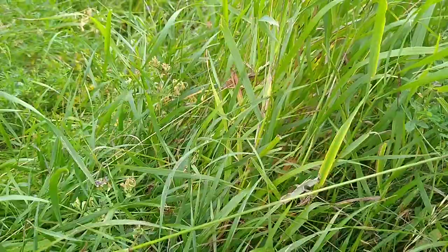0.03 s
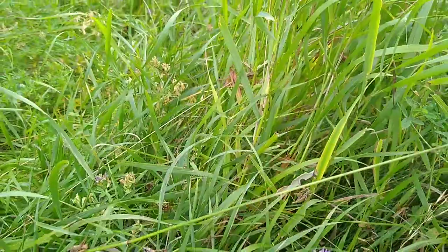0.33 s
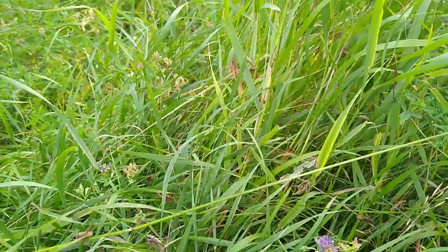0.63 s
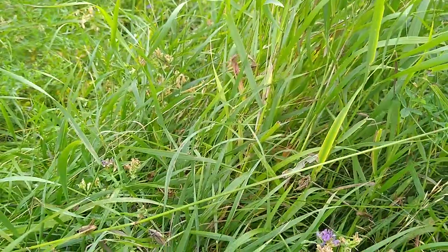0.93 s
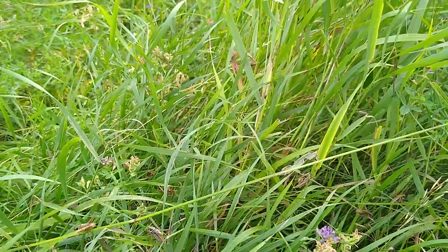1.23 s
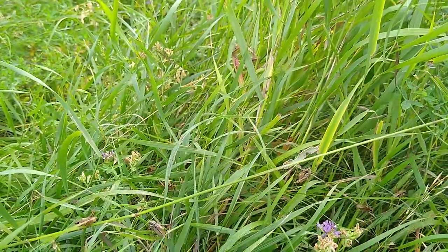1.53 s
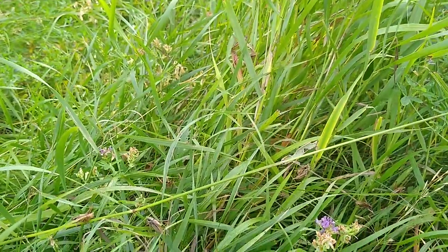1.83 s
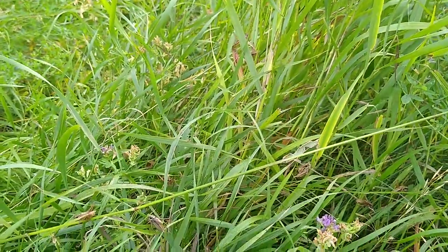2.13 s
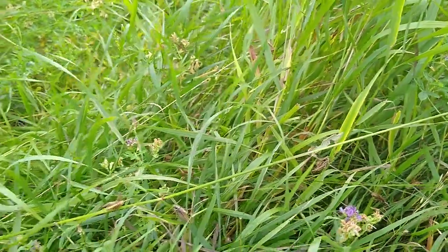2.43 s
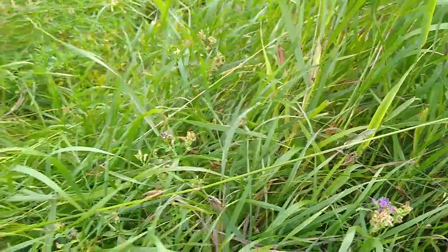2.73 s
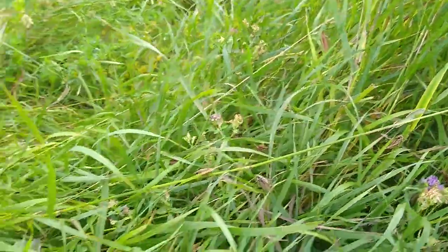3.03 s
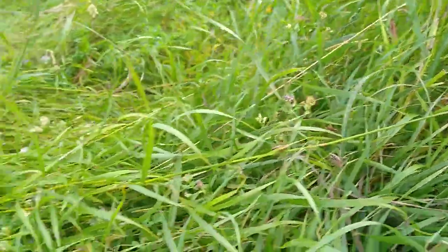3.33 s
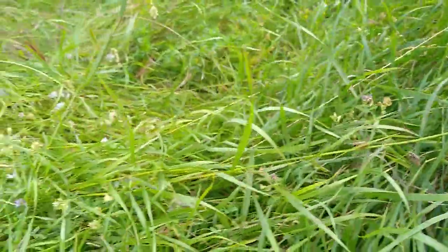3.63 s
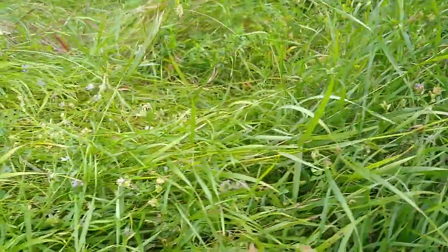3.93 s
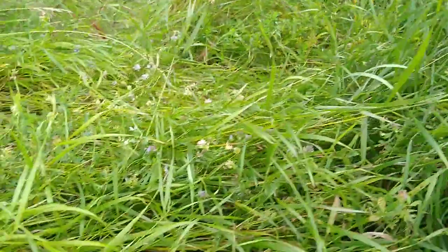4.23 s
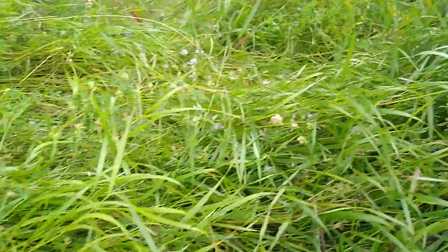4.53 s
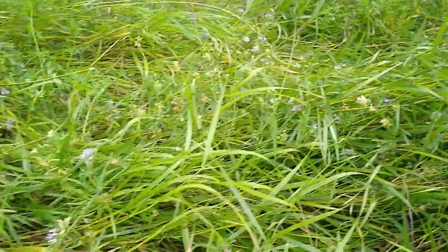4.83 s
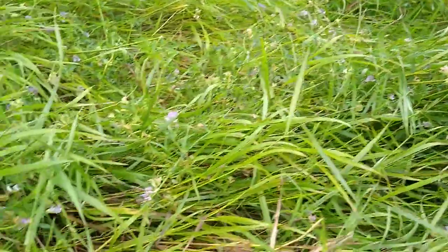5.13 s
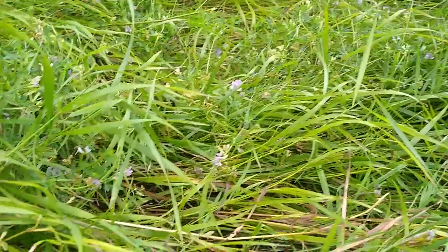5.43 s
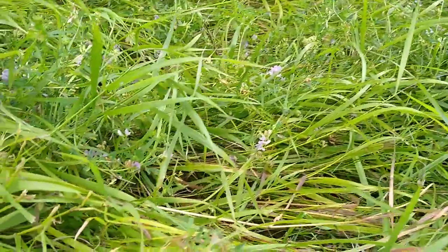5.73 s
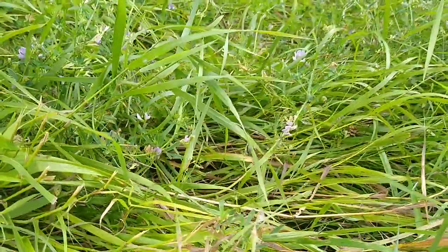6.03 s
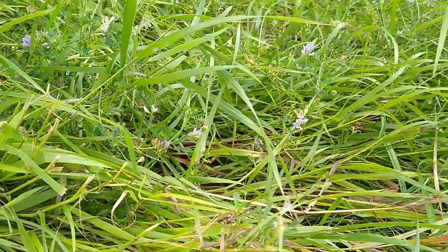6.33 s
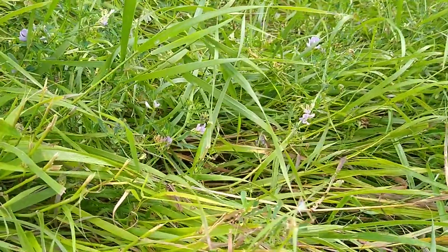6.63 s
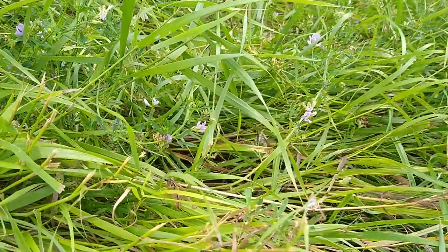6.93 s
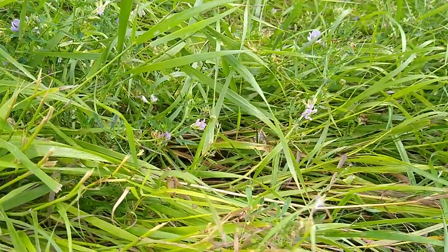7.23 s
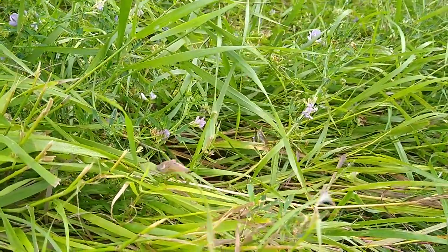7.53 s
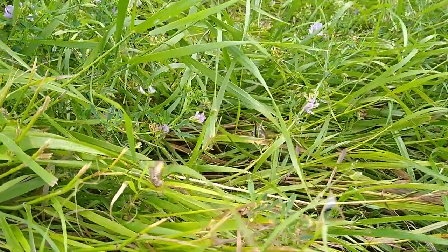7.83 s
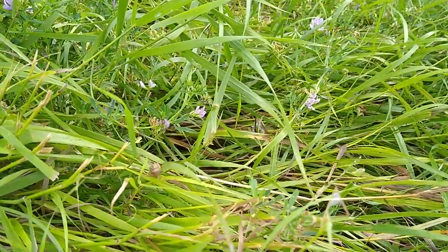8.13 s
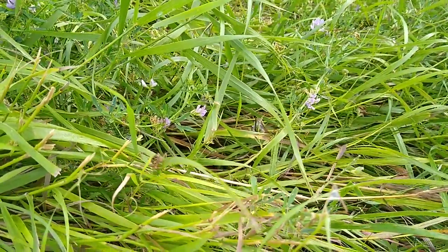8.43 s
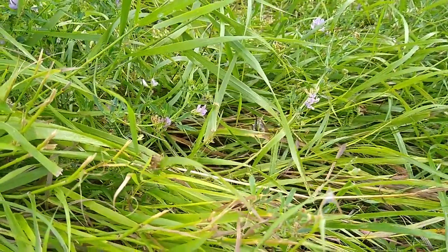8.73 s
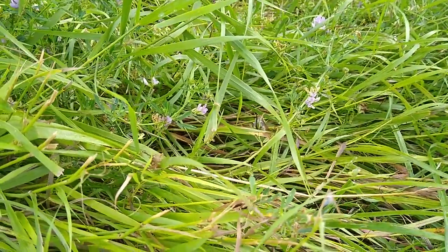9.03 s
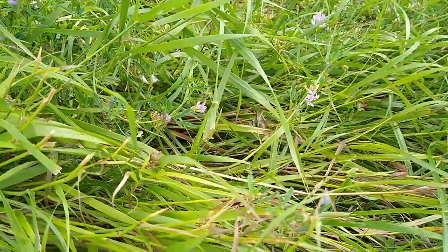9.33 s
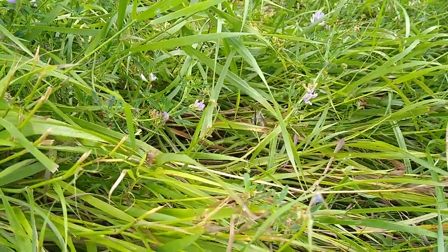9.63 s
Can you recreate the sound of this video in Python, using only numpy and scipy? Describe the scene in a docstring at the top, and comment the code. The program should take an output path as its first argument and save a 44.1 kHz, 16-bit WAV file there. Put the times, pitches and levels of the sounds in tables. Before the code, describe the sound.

A continuous high-pitched insect buzz shifts between singers, while a light breeze stirs grass and far traffic rumbles.

```python
"""A high, rasping buzz in tall grass: near bush-crickets take turns over a chorus of far ones.
They sing by stridulation: about fifty times a second the closing wings drag a file of teeth over
a scraper, and the impacts excite a wing resonance. A breeze rustles the grass, a distant road
rumbles, and the drone of an engine grows as it draws near."""
import sys
import numpy as np
from scipy import signal
from scipy.fft import rfft, irfft, next_fast_len
from scipy.io import wavfile

SR = 44100
rng = np.random.default_rng(int(sys.argv[2]) if len(sys.argv) > 2 else 0)


def inscribe(sig):
    """Save sig as 16-bit PCM at rate SR to the path in sys.argv[1].

    A 1-D sig is mono; a 2-D sig holds one channel per row.
    Samples are clipped to [-1, 1] before scaling.
    """
    pcm = np.round(np.clip(np.atleast_2d(sig).T, -1, 1) * 32767)
    wavfile.write(sys.argv[1], SR, pcm.astype(np.int16))


N = 431738
TIME_S = np.arange(N) / SR
EARS = np.array([[1], [-1]])   # left, right
MIC_LAG_S = .00048   # travel time of sound between the microphones


def near_crickets():
    """Stridulation: long wing strokes make a rasp, short ones a train of ticks."""
    # Each row: start and end in seconds, level, settling drop and left-over-right balance in dB,
    # strokes per second at start, middle and end, time of one stroke in seconds, haze level in dB,
    # wing resonance in Hz and its height in dB.
    rasps = [(0, .44, -33.2, 0, 3, 51.12, 50.93, 50.6, .2313, -2, 15800, 1.5),
             (2.65, 3.6, -46.5, 0, -5, 48.3, 48.3, 48.3, 3.0, 0, 13050, 9),
             (3.66, 6.33, -35.4, 5.5, -7, 51.5, 51.59, 50.34, 4.9893, -2.3, 14800, 1.5),
             (9.42, 9.9, -46, 0, -7, 52.8, 51.0, 51.4, 9.619, 1, 14700, 3)]
    # Each row: as for the rasps, but the last column is the stroke width in seconds.
    ticks = [(.4, 1.38, -46.3, 0, 3, 52.46, 49.74, 50.66, .893, 0, 14500, .00035),
             (.45, 2.6, -50, 1, -5, 53.6, 53, 51.5, 1.2, 2, 14300, .0005),
             (1.41, 2.65, -45.8, 0, 3.5, 49.07, 49.47, 50.24, 2.0356, 0, 14700, .0003),
             (4.2, 8.05, -46.6, 1, -7, 51.6, 49.96, 46.42, 6.1395, -1, 14450, .0005),
             (7.7, 9.38, -52, 1, 3, 52.5, 51.73, 50.33, 8.5522, 2, 14600, .0005)]
    buzz = 0
    for voice, songs in ((rasping_wing, rasps), (ticking_wing, ticks)):
        for start_s, end_s, level_db, drop_db, pan_db, *rates, stroke_at_s, haze_db, hz, timbre in songs:
            gain, per_s = song(start_s, end_s, level_db, drop_db, rates)
            buzz = buzz + gain * voice(per_s, stroke_at_s, pan_db, haze_db, hz, timbre)
    return buzz


def rasping_wing(per_s, stroke_at_s, pan_db, haze_db, wing_hz, peak_db):
    """Impulse excitation: each tooth that slips over the scraper clicks the resonant wing."""
    # Each row: frequency in Hz, spectral density of a near wing in relative dB.
    wing = [(7500, -42), (9000, -34), (10500, -23), (12000, -15.5), (13300, -8), (14500, -2.5),
            (15100, -2.5), (15800, 0)]
    half_width_hz, teeth_per_s = 550, 1700
    spectrum = [(hz, at_hz(wing, hz) + peak_db / (1 + ((hz - wing_hz) / half_width_hz) ** 2))
                for hz in np.linspace(wing[0][0], wing[-1][0], 40)]
    force = wing_force(per_s, stroke_at_s, stroke_s=.0022, opening_db=-14) * from_db(drift(50))
    teeth_passed = np.cumsum(teeth_per_s * from_db(2.2 * drift(1200))) / SR
    slips = np.diff(np.floor(teeth_passed), prepend=0)
    clicks = slips * force * from_db(rng.standard_normal(N))
    return through_grass(coloured(clicks, spectrum), spectrum, force, pan_db, haze_db, haze_s=.0021)


def ticking_wing(per_s, stroke_at_s, pan_db, haze_db, wing_hz, stroke_s):
    """Forced vibration near resonance: each quick stroke gives one ping of slightly different pitch."""
    force = wing_force(per_s, stroke_at_s, stroke_s, opening_db=-12) * from_db(drift(50))
    ping_hz = wing_hz + 350 * (drift(50) + drift(2500))
    ping = force * np.sin(2 * np.pi * np.cumsum(ping_hz) / SR)
    resonance = [(wing_hz + offset_hz, db)
                 for offset_hz, db in [(-4000, -24), (-1500, -10), (-400, 0), (300, 0), (1200, 0)]]
    return through_grass(ping, resonance, force, pan_db, haze_db, haze_s=.002)


def wing_force(per_s, stroke_at_s, stroke_s, opening_db):
    """Periodic drive: force builds through each stroke and lets go quickly; opening is the weaker."""
    cycles = np.cumsum(per_s) / SR
    cycles = cycles - np.interp(stroke_at_s, TIME_S, cycles) + .5 + .015 * drift(40)

    def stroke(lag_cycles):
        offset = ((cycles - lag_cycles) % 1 - .5) / per_s / stroke_s
        return np.exp(-.5 * (offset / np.where(offset < 0, 1.35, .65)) ** 2)
    return stroke(0) + from_db(opening_db) * stroke(.6)


def song(start_s, end_s, level_db, drop_db, rates):
    """Amplitude and rate modulation: a song swells, settles by `drop_db`, falters and dies away."""
    attack_s, settle_s, release_s = .05, .76, .064
    falter_per_s, falter_s = 3.5, .08
    age = np.clip(TIME_S, start_s, end_s) - start_s
    edges = np.maximum(start_s - TIME_S, 0) / attack_s + np.maximum(TIME_S - end_s, 0) / release_s
    settled = 1 - np.exp(-(age / settle_s) ** 2)
    gain = from_db(level_db - drop_db * settled) * np.exp(-edges)
    per_s = np.interp(TIME_S, np.linspace(start_s, end_s, len(rates)), rates)
    falter = falter_per_s * np.exp((start_s + age - end_s) / falter_s)
    return gain, per_s - falter


def through_grass(direct, spectrum, force, pan_db, haze_db, haze_s):
    """Scattering: blades add a short haze to each stroke; the far microphone hears the stroke later."""
    decay = np.exp(-1 / (haze_s * SR))
    scattered_power = signal.lfilter([1 - decay], [1, -decay], force ** 2 + 1e-12)
    haze = coloured(np.sqrt(scattered_power) * rng.standard_normal((2, N)), spectrum)
    lag_samples = int(pan_db * 2)
    direct = rms_one(np.array([direct, np.roll(direct, lag_samples)]))
    return rms_one(direct + from_db(haze_db) * haze) * from_db(EARS * pan_db / 2)


def leaf_echoes(buzz, echo_db=-19, sways_per_s=2.5):
    """Comb filtering: faint echoes from swaying leaves come and go, slowly recolouring the buzz."""
    # Each entry: the delay of one echo in seconds.
    delays_s = [.0005, .0013, .0034]
    echoes = sum(drift(sways_per_s) * np.roll(buzz, int(s * SR), axis=-1) for s in delays_s)
    return buzz + from_db(echo_db) * echoes


def far_crickets():
    """Incoherent sources: two groups of far singers, left and right, are heard through the grass."""
    # Each row: frequency in Hz, spectral density in relative dB.
    left_wing = [(7000, -35.5), (8500, -28.5), (10000, -19.5), (11300, -12), (12800, -8.5), (14200, -10),
                 (15100, -2.5), (15700, -1)]
    right_wing = [(7000, -43), (8500, -30.5), (10000, -21), (11300, -14.5), (12800, -9), (14200, -4.5),
                  (15100, -1), (15700, -3)]
    # Each row: time in seconds, level in dB, which changes as the microphone turns away.
    left_level = [(0, -47), (.9, -46.5), (1.6, -44), (2.5, -43.5), (3, -46), (3.7, -46.5), (6.2, -47.5),
                  (7.201, -49.5), (8.6, -48), (9.79, -48)]
    right_level = [(0, -45), (.9, -46.5), (1.6, -44.5), (2.5, -45), (3.7, -47), (5, -48.5), (6.3, -46.5),
                   (7.8, -47), (8.5, -49), (9.79, -47)]
    return chorus(left_wing, left_level, pan_db=4.5) + chorus(right_wing, right_level, pan_db=-8)


def chorus(spectrum, levels, pan_db, singers=4, blur_db=3, grain_db=2.5):
    """Power summation: singers, each at its own pace, blur into a fizzing hiss."""
    level_db, = in_time(levels)
    power = 0
    for _ in range(singers):
        per_s = rng.uniform(47, 53) + .6 * drift(1)
        power = power + wing_force(per_s, rng.random(), stroke_s=.0016, opening_db=-10) ** 2
    grain = from_db(grain_db * np.array([drift(1500) for _ in EARS]))
    hiss = np.sqrt(power + from_db(blur_db)) * grain * rng.standard_normal((2, N))
    return coloured(hiss, spectrum) * from_db(level_db + EARS * pan_db / 2)


def grass():
    """Friction noise: gusts rustle the grass in flurries, single blades brush, and tufts swish."""
    # Each row: time of the peak in seconds, half length in seconds, level in dB.
    gusts = [(.25, 0.4, -69.5), (1.797, 0.44, -65.5), (2.602, 0.29, -68.5), (3.185, 0.22, -65),
             (3.692, .22, -61), (4.3, 0.36, -73.5), (6.4, 0.53, -71), (7.5, 2.3, -84)]
    tufts = [(.15, .17, -73.5), (3.2, .3, -75), (3.8, .09, -64.5)]
    # Each row: time of the peak in seconds, decay time in seconds, level in dB.
    touches = [(1.635, .025, -70), (1.945, .025, -64), (2.415, .035, -59), (2.515, 0.023, -68),
               (2.595, .025, -62), (3.405, .08, -63), (4.235, .04, -65), (4.325, .025, -72),
               (4.785, .03, -68), (6.13, .07, -68), (6.45, .06, -71), (6.74, .025, -70), (6.925, .025, -73)]
    # Each row: frequency in Hz, spectral density in relative dB.
    rustle_spectrum = [(1200, -19), (2200, 19.5), (3500, 15), (4300, 11.5), (5300, 4.5), (7500, -1),
                       (12000, -37)]
    brush_spectrum = [(1800, -15), (2700, -20), (3700, 11), (4500, -7), (6000, -4), (9000, -26)]
    swish_spectrum = [(1500, -17), (2500, -18), (4500, -1), (6500, 5), (8000, 1), (10000, 8), (12000, 3)]
    flutter_db, grain_db = 1.6, 1.8
    flurries = rms_one(from_db(flutter_db * drift(28) + grain_db * drift(900)))
    rustle = sum(swell(*gust) for gust in gusts) * wide_left_noise(rustle_spectrum)
    brushes = sum(brush(*touch) for touch in touches) * diffuse_noise(brush_spectrum)
    swish = sum(swell(*tuft) for tuft in tufts) * diffuse_noise(swish_spectrum)
    return flurries * (rustle + brushes + swish)


def brush(peak_s, decay_s, level_db, attack_s=.015):
    """Transient envelope: the gain of a touch between blades rises and decays exponentially."""
    age = TIME_S - peak_s
    return from_db(level_db) * np.exp(-np.maximum(-age / attack_s, age / decay_s))


def road():
    """Broadband traffic noise: nearing and passing vehicles add their power to a steady floor."""
    # Each row: frequency in Hz, spectral density in relative dB.
    rumble_spectrum = [(20, -47), (32, -22), (48, -5), (65, 0.5), (90, 2.5), (115, -2), (160, -12),
                       (300, -33)]
    growl_spectrum = [(60, -8), (95, 2.5), (125, 2.5), (165, -0.5), (210, -4.5), (280, -19), (400, -20),
                      (800, -49)]
    tyre_spectrum = [(250, -5), (400, -11), (520, -7.5), (680, -4), (930, 1.5), (1250, -.5), (1900, -7),
                     (2500, -13), (3100, -18), (3900, -21.5), (5000, -28.5), (7000, -33.5)]
    # Each row: time of the peak in seconds, half length in seconds, level of tyre roar in dB.
    cars = [(4.2, .74, -55.5), (9.1, .35, -57)]
    rumble = from_db(-50) * diffuse_noise(rumble_spectrum)
    growl = np.hypot(from_db(-56), from_db(-49.5) * approach()) * diffuse_noise(growl_spectrum)
    tyre_power = from_db(-52.5) ** 2 + sum(swell(*car) ** 2 for car in cars)
    return rumble + growl + np.sqrt(tyre_power) * wide_left_noise(tyre_spectrum)


def engines():
    """Periodic sources: one far engine labours on a low note while a higher one draws near."""
    # Each row: time in seconds, pitch in Hz, level in dB.
    labouring = [(0, 73.07, -49), (2.5, 73.04, -49.3), (4.8, 69.27, -49.7), (6.5, 71.3, -52),
                 (8.7, 73.86, -51.5), (9.79, 76.4, -48.5)]
    low_hz, low_db = in_time(labouring)
    low = from_db(low_db) * drone(low_hz, wavers_per_s=22, wander_hz=2.58, flutter_db=-1.5)
    high = from_db(-46.5) * approach() * drone(137.2, wavers_per_s=12, wander_hz=1, flutter_db=-.2)
    return from_left(low + high)


def approach(closest_s=9.21, passing_s=1.23):
    """Inverse-distance law: gain of an engine that covers its closest distance in `passing_s`."""
    return 1 / np.hypot(1, (TIME_S - closest_s) / passing_s)


def tyre_whine():
    """Tonal rolling noise: tyres sing faintly on the far road, wavering apart at each microphone."""
    # Each row: peak time and half length in seconds, level in dB, pitch in Hz, glide in Hz per second.
    whines = [(3.4, 1.6, -71, 552, 0), (7.3, .4, -64.5, 545, 0), (8.65, .6, -62.7, 547, 0),
              (9.4, .35, -65, 513, -60)]
    sound = 0
    for peak_s, half_s, level_db, peak_hz, glide in whines:
        hz = peak_hz + glide * (TIME_S - peak_s)
        tones = np.array([drone(hz, wavers_per_s=50, wander_hz=7.03, flutter_db=3.5) for _ in EARS])
        sound = sound + swell(peak_s, half_s, level_db) * tones
    return sound


def drone(hz, wavers_per_s, wander_hz, flutter_db):
    """Atmospheric fluctuation: a far tone wavers in pitch and strength on its way through the air."""
    phase = 2 * np.pi * np.cumsum(hz + wander_hz * drift(wavers_per_s)) / SR
    return rms_one(from_db(flutter_db * drift(wavers_per_s)) * np.sin(phase))


def wide_left_noise(spectrum, direct_db=-5.5):
    """An extended source on the left: part of its noise comes straight, the rest from all around."""
    diffuse = diffuse_noise(spectrum)
    direct = from_left(coloured(rng.standard_normal(N), spectrum))
    return diffuse + from_db(direct_db) * direct


def diffuse_noise(spectrum):
    """Diffuse-field coherence: the microphones agree in the bass and are unrelated in the treble."""
    mid, side = rng.standard_normal((2, N))
    coherence = lambda hz: .95 * np.sinc(2 * hz * MIC_LAG_S)
    mid = filtered(mid, lambda hz: np.sqrt(1 + coherence(hz)))
    side = filtered(side, lambda hz: np.sqrt(1 - coherence(hz)))
    return coloured(mid + EARS * side, spectrum)


def from_left(x):
    """Arrival-time delay: the sound reaches the left microphone first."""
    return np.array([x, np.roll(x, round(MIC_LAG_S * SR))])


def swell(peak_s, half_s, level_db):
    """Gaussian envelope: a gain that rises and falls in a bell."""
    return from_db(level_db) * np.exp(-.5 * ((TIME_S - peak_s) / half_s) ** 2)


def drift(per_s):
    """Random modulation: a curve of unit rms that takes a new course `per_s` times a second."""
    knots = rng.standard_normal(50000)
    return rms_one(np.interp(TIME_S * per_s, np.arange(len(knots)), knots))


def coloured(x, spectrum):
    """Spectral shaping to unit rms, falling 24 dB per octave beyond the ends of the table."""
    low_hz, high_hz = spectrum[0][0], spectrum[-1][0]
    skirts = lambda hz: np.minimum(hz / low_hz, 1) ** 4 * np.minimum(high_hz / (hz + 1), 1) ** 4
    return rms_one(filtered(x, lambda hz: from_db(at_hz(spectrum, hz)) * skirts(hz)))


def filtered(x, gain_at):
    """Zero-phase filtering by a gain given as a function of frequency."""
    size = next_fast_len(N)
    hz = np.arange(size // 2 + 1) * SR / size
    return irfft(rfft(x, size) * gain_at(hz), size)[..., :N]


def at_hz(spectrum, hz):
    """Interpolation of a spectrum on a log-frequency axis."""
    table_hz, db = np.transpose(spectrum)
    return np.interp(np.log(hz + 1), np.log(table_hz), db)


def in_time(rows):
    """Linear interpolation: each column after the time becomes a curve over all samples."""
    times_s, *columns = np.transpose(rows)
    return [np.interp(TIME_S, times_s, column) for column in columns]


def from_db(db):
    """Decibels to amplitude ratio."""
    return 10 ** (np.asarray(db) / 20)


def rms_one(x):
    """Normalisation to unit power."""
    return x / np.sqrt(np.mean(x ** 2) + 1e-20)


def scene():
    """Superposition in stereo; the right microphone picks up a little more of the background."""
    background = (road() + grass() + engines() + tyre_whine()) * from_db(-.45 * EARS)
    far_singers = far_crickets()
    return leaf_echoes(near_crickets()) + far_singers + background


def record(dry, cutoff_hz=15780, transition_hz=120):
    """Band limiting: a steep low-pass cuts the highest treble."""
    return filtered(dry, lambda hz: np.clip((cutoff_hz - hz) / transition_hz + .5, 0, 1))


dry = scene()
out = record(dry)
inscribe(out)
```